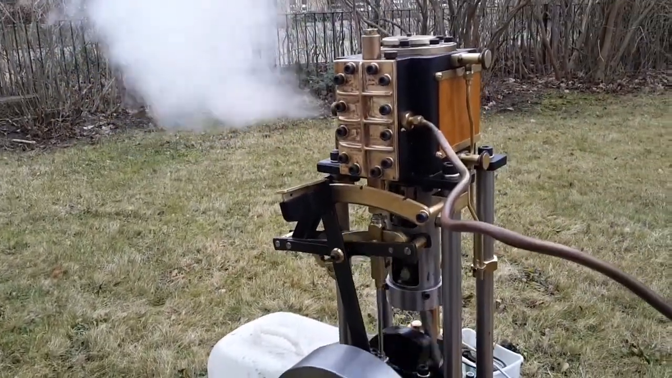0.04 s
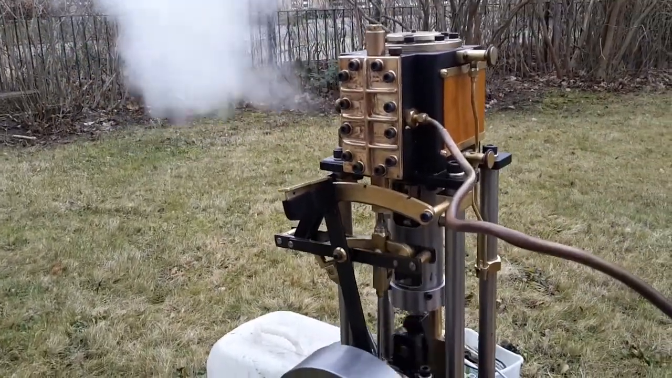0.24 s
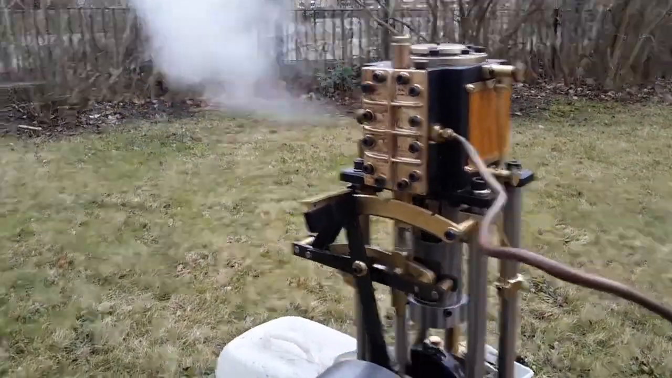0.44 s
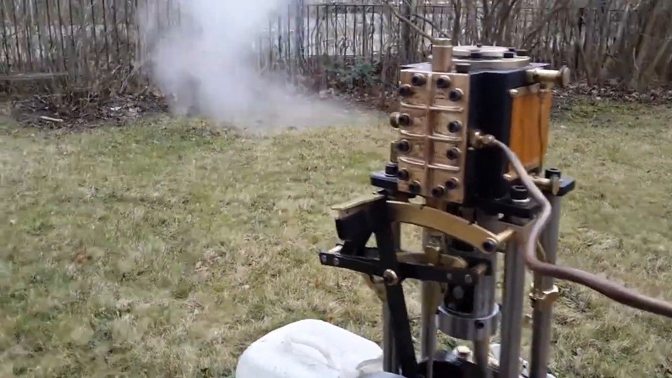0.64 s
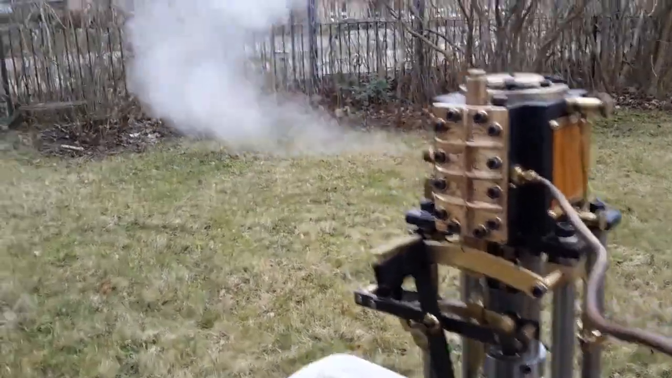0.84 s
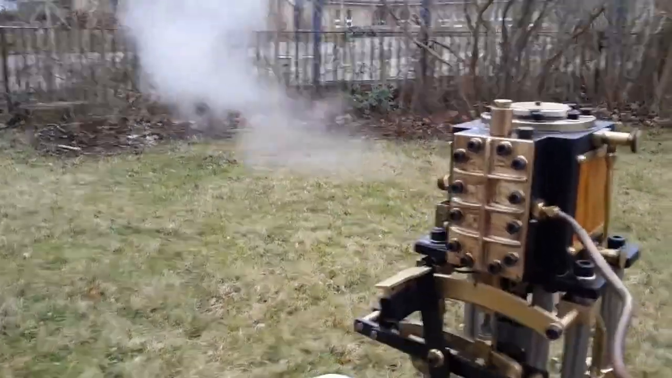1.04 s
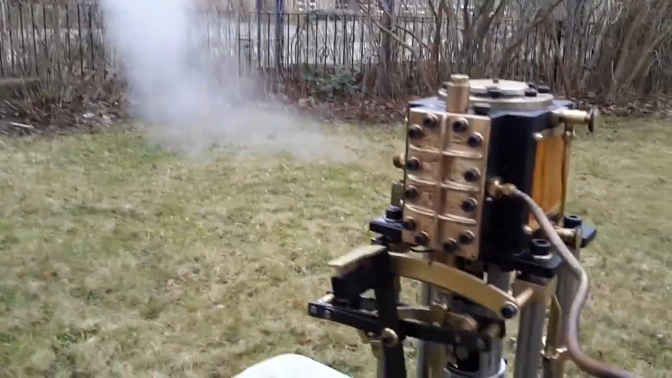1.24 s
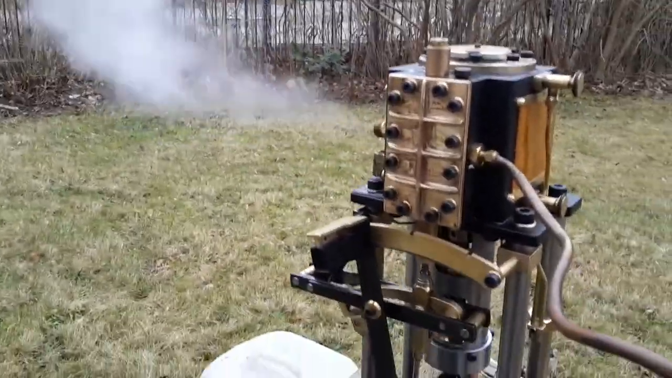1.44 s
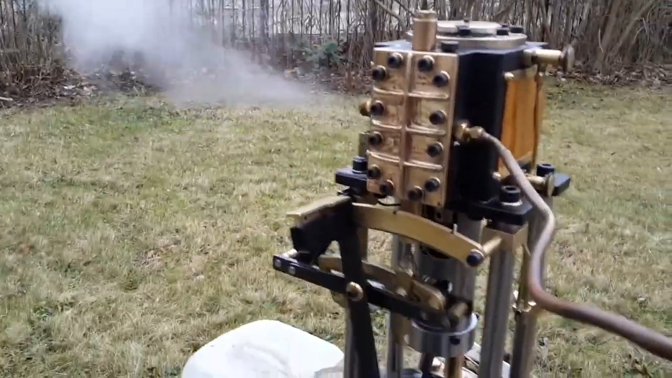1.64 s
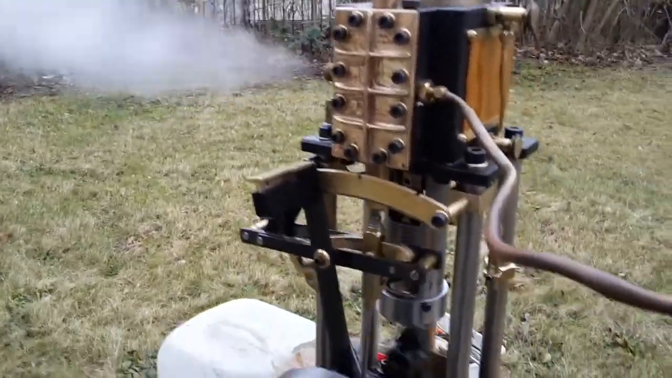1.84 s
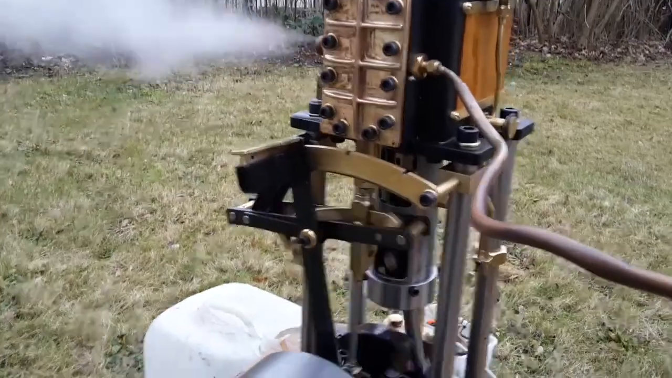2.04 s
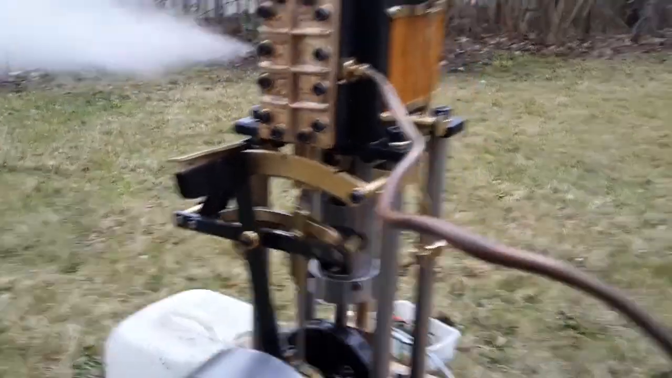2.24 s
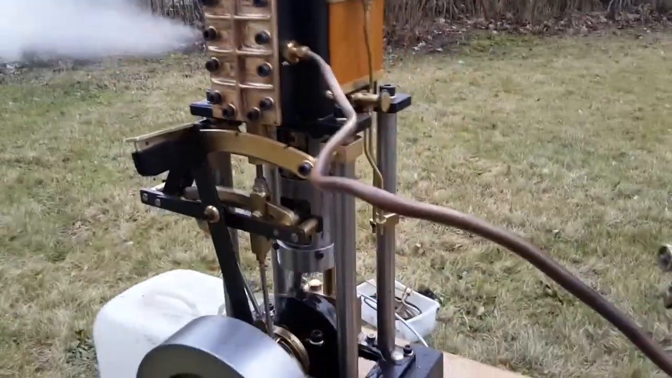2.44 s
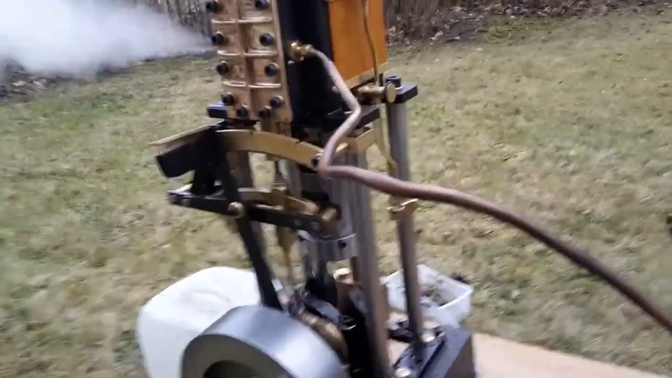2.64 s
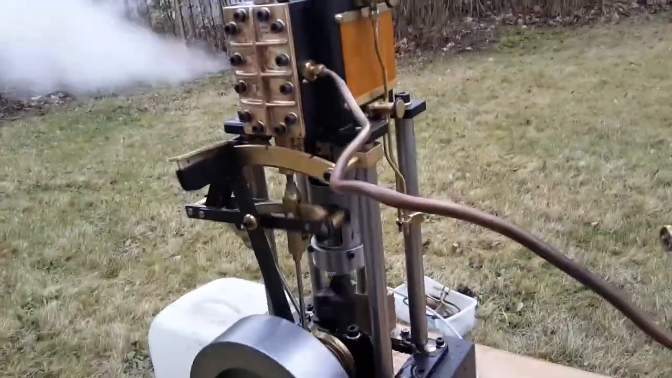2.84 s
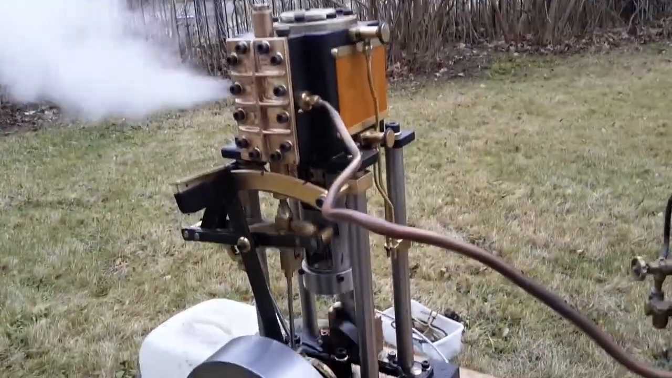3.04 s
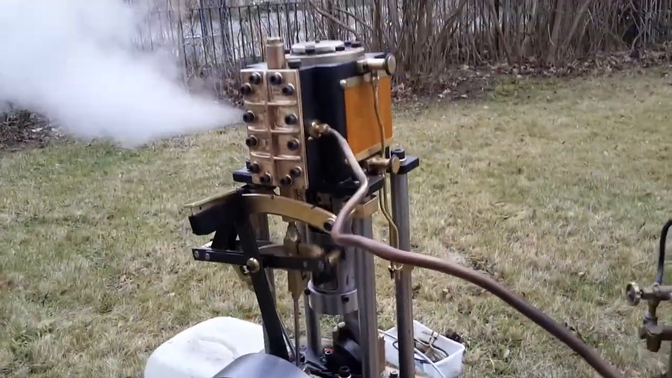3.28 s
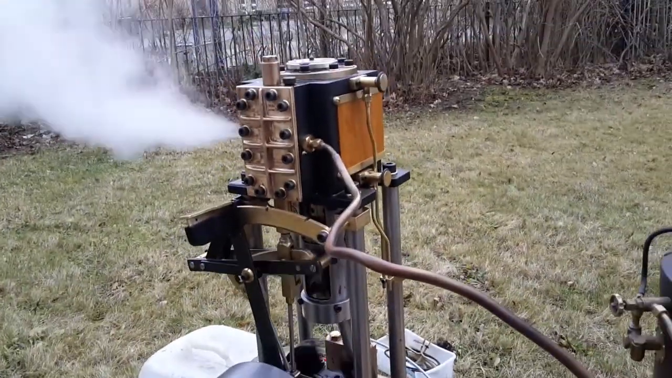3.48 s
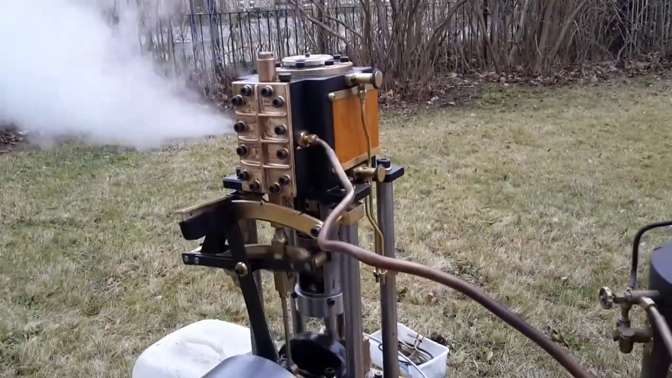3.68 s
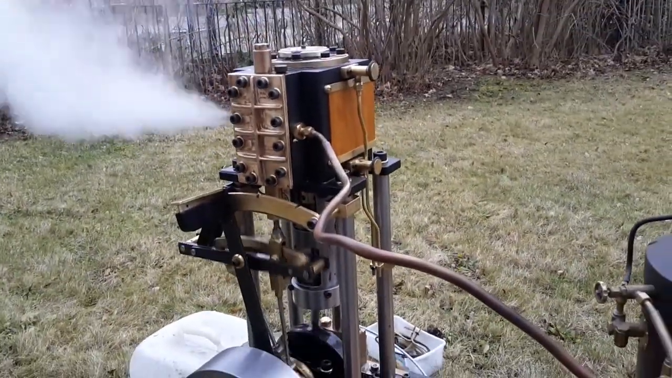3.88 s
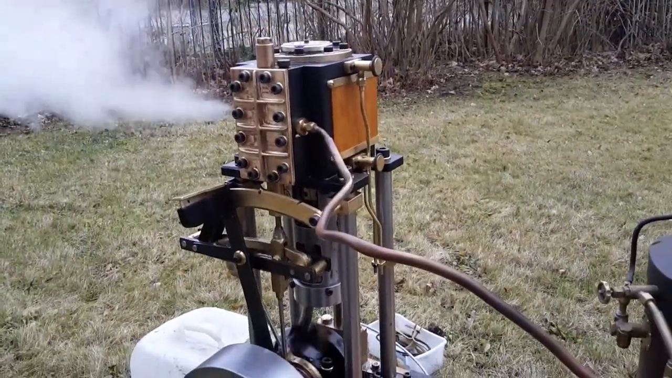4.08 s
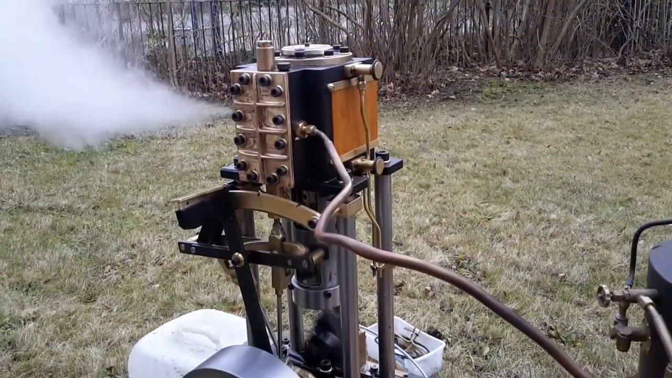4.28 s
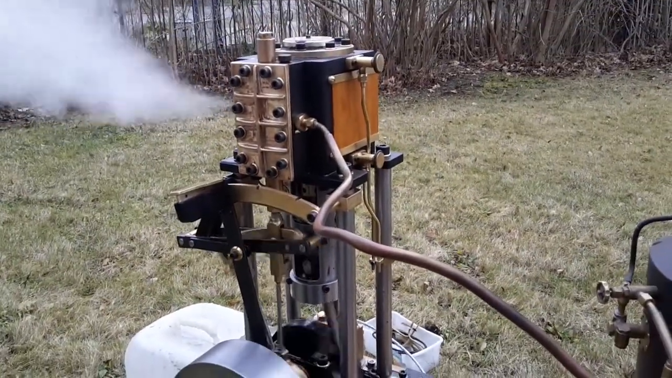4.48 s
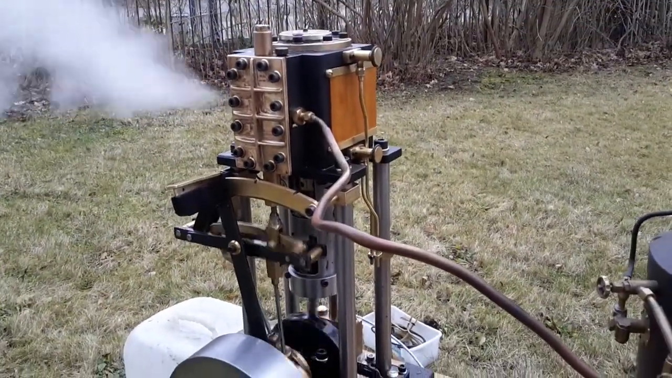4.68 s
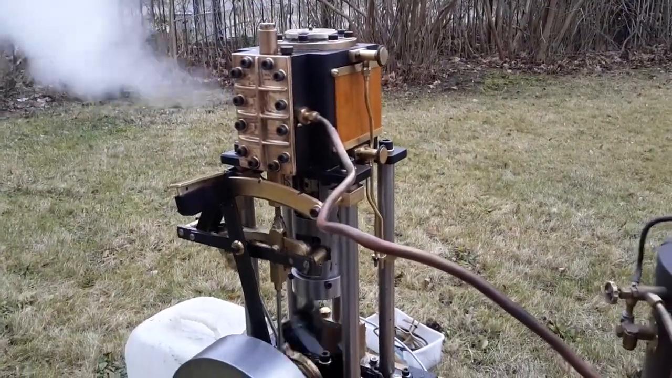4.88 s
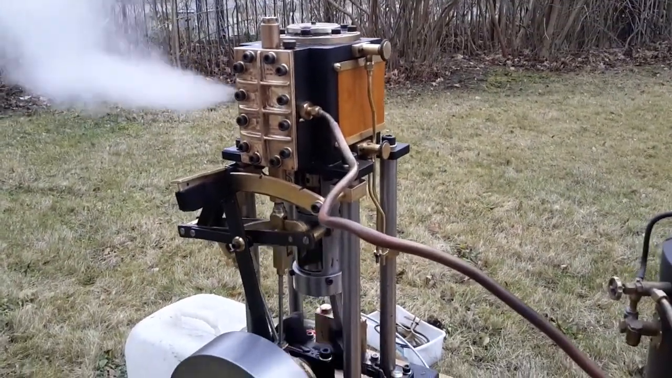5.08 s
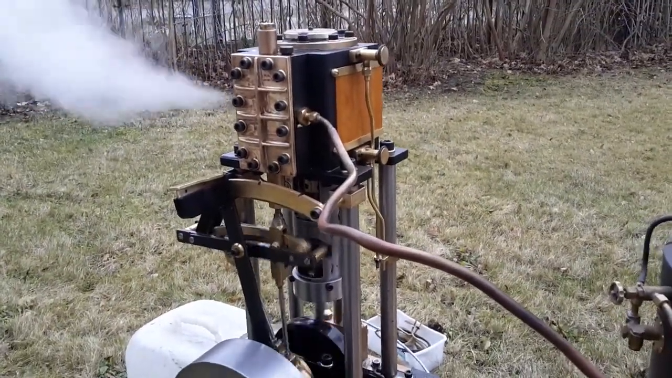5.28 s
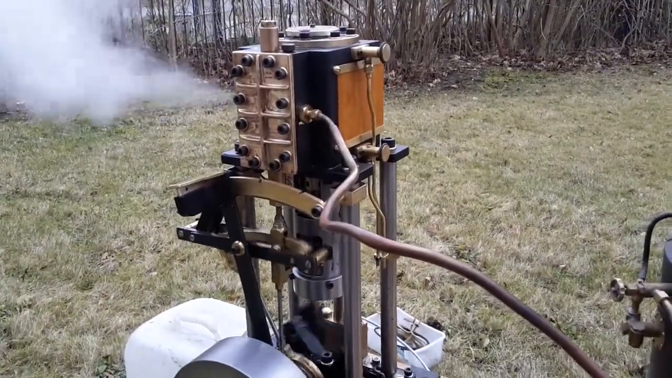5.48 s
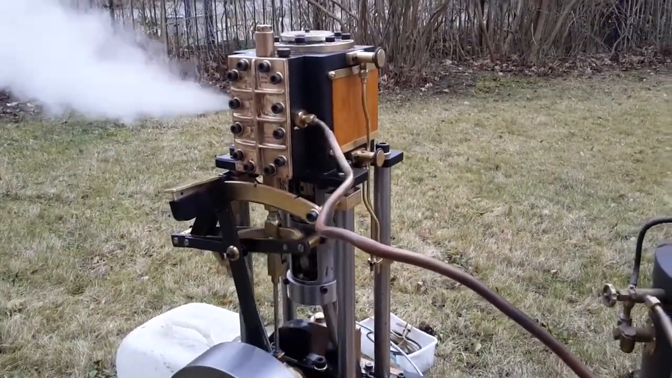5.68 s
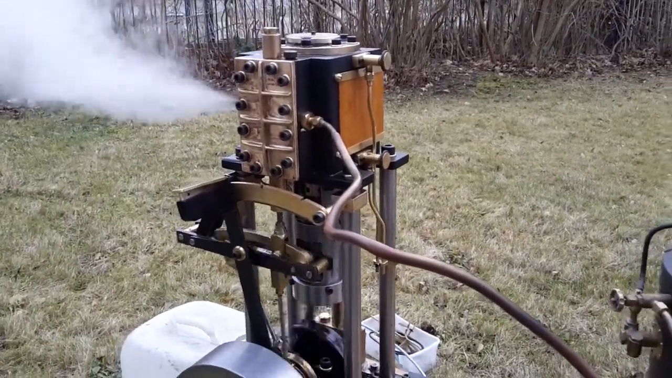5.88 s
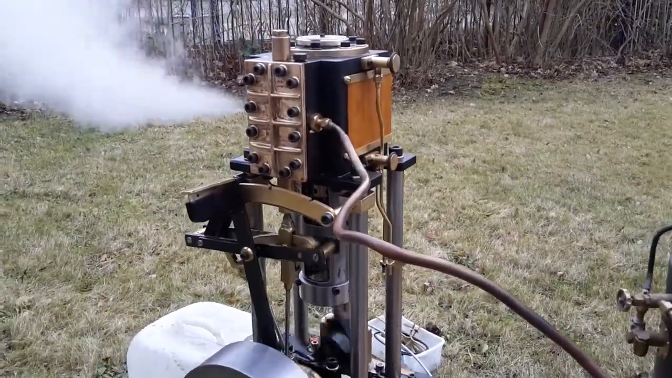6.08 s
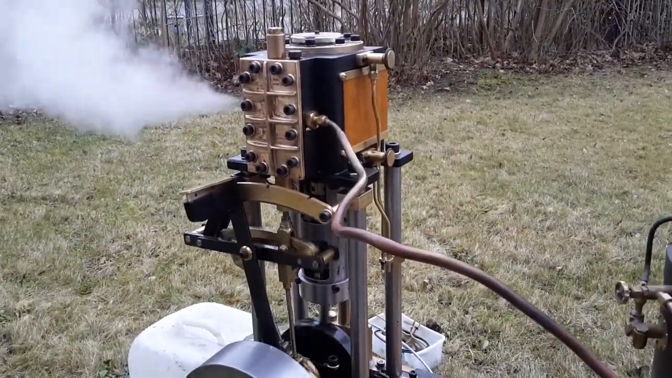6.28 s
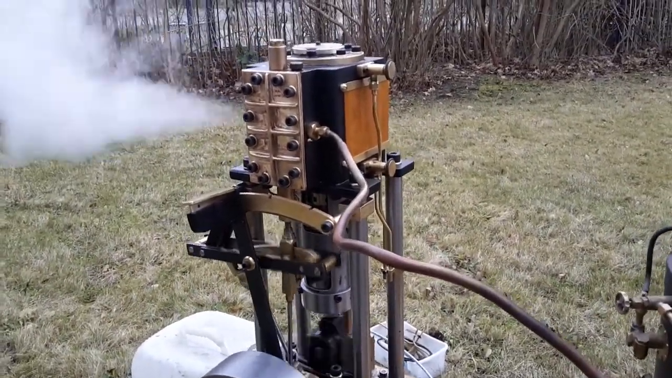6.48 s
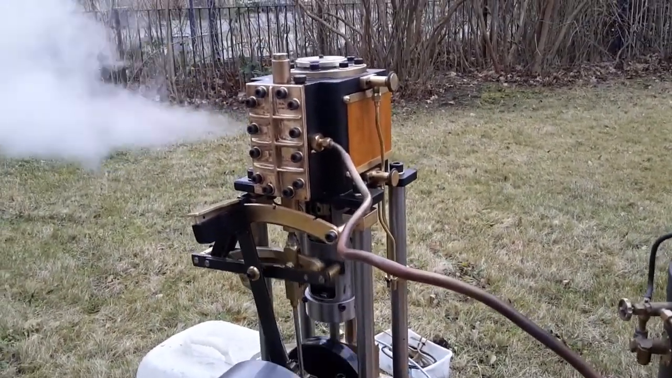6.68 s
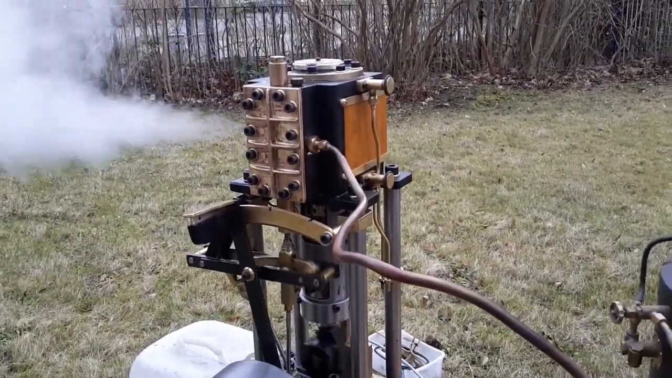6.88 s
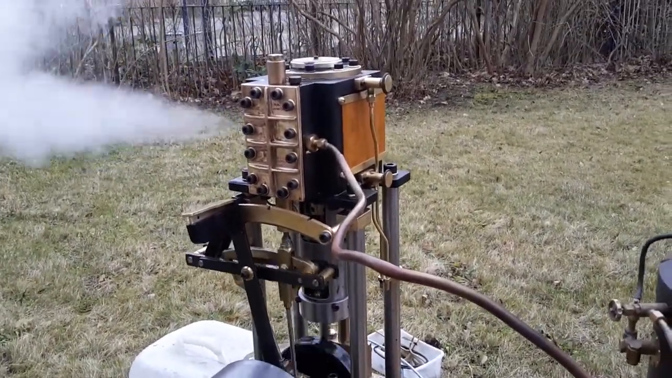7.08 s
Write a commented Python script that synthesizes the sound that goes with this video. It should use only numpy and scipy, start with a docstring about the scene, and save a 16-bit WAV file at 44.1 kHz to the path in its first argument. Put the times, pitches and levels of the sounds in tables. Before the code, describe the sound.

A small steam engine runs outdoors, close to the microphone, with a thin, whistling steam leak on the right. Its metal linkage clunks as it labours through three slow turns, each with a spit of steam, knocks and two soft chuffs. Steam squeals once and sputters, then the engine speeds up into quick chuffing and knocking with tiny bright clicks. It gradually slows and softens as the steam runs out.

```python
"""A small single-cylinder steam engine on a lawn, its leaking gland hissing and whistling on the right.
The reversing link clunks as the engine labours through three slow turns. Every turn brings a spit of
steam, knocks at both dead centres and two soft exhaust chuffs. Steam squeals once in the gland,
then the throttle opens and the engine picks up speed, with bright clicks of bare steel.
At last it slows as the steam runs out, and a slack rod adds its knock."""
import sys
import numpy as np
from scipy import signal
from scipy.fft import rfft, irfft, next_fast_len
from scipy.io import wavfile
from scipy.ndimage import map_coordinates

SR = 44100
rng = np.random.default_rng(int(sys.argv[2]) if len(sys.argv) > 2 else 0)


def transcribe(signal):
    """Save signal, clipped to [-1, 1], as a 16-bit WAV file at the path in sys.argv[1]."""
    frames = np.atleast_2d(signal).T
    limited = np.clip(frames, -1, 1)
    pcm = np.round(limited * 32767).astype(np.int16)
    wavfile.write(sys.argv[1], SR, pcm)


N = 313992
TIME = np.arange(N) / SR
FULL_DB = -35  # boiler steam at full pressure
# each stroke opens and shuts a port: widest_at_turns, opening_turns, shutting_turns
DOWN_STROKE, UP_STROKE = (0.35, 0.22, 0.095), (0.81, 0.15, 0.14)
# one row per revolution, from the upper dead centre:
# start_s, down_stroke_share, spit_db, bark_db, knock_db, down_chuff_db, up_chuff_db
TURNS = [(0.086, .42, -34.5, -42, -32, 4.5, -3), (0.6654, 0.4, -32, -40.5, -31, 7, 1),
         (1.2715, 0.51, -34.5, -44, -32, 7, 0.5), (1.823, .52, -26, -31.5, -29, 1, -6.5),
         (2.1286, 0.5, -26.5, -28.5, -28.5, -0.5, -3), (2.384, .5, -28, -30.5, -28.5, -0.5, -3),
         (2.6234, 0.49, -26.5, -30, -28, -1, -3.5), (2.8534, 0.49, -29.5, -32, -30, 0, -4),
         (3.0852, 0.49, -28.5, -32.5, -29.5, 1, -3.5), (3.315, 0.5, -30, -37, -29.5, -0.5, -3),
         (3.5495, 0.49, -31, -32.5, -30, 1.5, -2.5), (3.7888, 0.49, -31, -34.5, -29.5, 0, -3),
         (4.036, 0.49, -32, -37, -30, 0.5, -2.5), (4.293, .5, -31, -34, -30, 1.5, -2),
         (4.5586, .5, -31, -36.5, -29.5, 1, -2.5), (4.834, 0.49, -32.5, -38, -29.5, 1, -1.5),
         (5.1211, 0.47, -34, -37, -29.5, 2, -1.5), (5.423, 0.48, -34.5, -37, -29.5, 2.5, -2),
         (5.7349, 0.49, -34, -36, -29, 1.5, -2), (6.066, 0.49, -33.5, -38.5, -29.5, 2, -2.5),
         (6.424, 0.48, -34, -39, -30.5, 2.5, -3.5), (6.8056, 0.5, -35, -42, -30, 1.5, -7)]
# resonances of the rods: pitch_hz, width_hz, level_db
RODS = [(324, 150, -5.5), (526.6, 43, 19), (688, 224, 20.5), (902, 49, 13), (2440, 550, 19)]
# colour of the gland's thin hiss: frequency_hz, level_db
LEAK = [(3000, -21), (6000, -4.5), (9000, -8), (10300, 2.5), (11000, 10), (11700, 4.5), (12300, -4),
        (13100, 5), (14100, -44), (15600, -1.5)]
# colour of wet, fizzing steam: frequency_hz, level_db
FIZZ = [(3500, -62), (5000, 3.5), (8000, 1), (9300, 6.5), (10300, 1), (11700, 5), (13000, 2), (14100, -9),
        (15600, 1)]


def amp(db):
    """Decibels to gain."""
    return 10 ** (np.asarray(db) / 20)


def unit(x):
    """Scale to rms 1."""
    return x / np.sqrt(np.mean(x ** 2) + 1e-20)


def along(points, hz):
    """Read (frequency_hz, value) points on a log axis."""
    frequencies, values = np.transpose(points)
    return np.interp(np.log(hz + 1), np.log(frequencies + 1), values)


def curve(points, at=TIME):
    """Glide through (position, value) points, by default over time."""
    return np.interp(at, *np.transpose(points))


def wobble(rate):
    """A smooth random curve, rate knots a second."""
    return map_coordinates(rng.standard_normal(int(N * rate / SR) + 4), [TIME * rate])


def filtered(x, response):
    """x through a complex frequency response."""
    size = next_fast_len(N + SR // 2)
    return irfft(rfft(x, size) * response(np.fft.rfftfreq(size, 1 / SR)), size)[..., :N]


def ring(x, modes, soft_hz, alternate=False):
    """x through resonances, in step or alternating in sign, dulled above soft_hz."""
    def body(hz):
        contact = 1 / (1 + np.sqrt(2) * 1j * hz / soft_hz - (hz / soft_hz) ** 2)
        return contact * sum(
            (-1) ** (k * alternate) * amp(db) * 1j * hz * width / (pitch ** 2 - hz ** 2 + 1j * hz * width)
            for k, (pitch, width, db) in enumerate(modes))
    onset = irfft(body(np.arange(SR // 2 + 1.)))[:round(.015 * SR)]
    return filtered(x, body) / np.sqrt(np.mean(onset ** 2))  # a unit blow has rms 1 for 15 ms


def rush(spectrum):
    """Stereo noise of rms 1, alike in the bass and wide in the treble."""
    # how alike left and right are: frequency_hz, correlation
    likeness = [(25, 0.78), (100, 1), (300, 0.97), (700, 0.91), (1400, 0.47), (3100, 1), (7000, 0.02),
                (15000, 0.3)]
    def colour(hz):
        spread = np.arccos(np.clip(along(likeness, hz), -1, 1)) / 2
        return amp(along(spectrum, hz)) * [np.cos(spread), np.sin(spread)]
    mid, side = filtered(rng.standard_normal((2, N)), colour)
    return unit(np.array([mid + side, mid - side]))


def band(hz, width_hz):
    """A noise band of rms 1 around a steady or moving centre."""
    phase = 2 * np.pi * np.cumsum(np.broadcast_to(hz, N)) / SR
    return unit(wobble(width_hz) * np.cos(phase) + wobble(width_hz) * np.sin(phase))


def burst(start_s, length_s, steep=1):
    """A swell that peaks at 1 after half its length and dies away."""
    age = np.clip(2 * (TIME - start_s) / length_s, 0, 20)
    return (age * np.exp(1 - age)) ** steep


def dead_centres():
    """Times of the upper dead centre, with one more revolution at either end."""
    s = np.array(TURNS)[:, 0]
    return np.r_[2 * s[0] - s[1], s, s[-1] + 1.07 * (s[-1] - s[-2])]


def half_turns():
    """Times of all dead centres, upper and lower, and the count of turns at each."""
    upper = dead_centres()
    down_share = np.r_[.5, np.array(TURNS)[:, 1]]
    lower = upper[:-1] + down_share * np.diff(upper)
    times = np.r_[np.column_stack([upper[:-1], lower]).ravel(), upper[-1]]
    return times, np.arange(len(times)) / 2 - 1


def crank():
    """Running count of turns, whole at each upper dead centre."""
    return np.interp(TIME, *half_turns())


def pressure():
    """Steam pressure in dB: the engine idles, the throttle opens, the steam runs out."""
    idle_db, open_s, opening_s = -56, 1.688, 0.41
    run_out_s, sag_db_per_s = 2.96, 3
    boiler_db = FULL_DB - sag_db_per_s * np.maximum(TIME - run_out_s, 0)
    throttle = np.sin(np.pi / 2 * np.clip((TIME - open_s) / opening_s, 0, 1))
    return idle_db + throttle * (boiler_db - idle_db)


def opening(widest, rise, fall):
    """A 0-1 swell once per revolution, its peak and slopes given in turns."""
    past = (crank() - widest + .5) % 1 - .5
    return np.exp(-(past / np.where(past < 0, rise, fall)) ** 2)


def ports(down_db, up_db):
    """Flow through the ports in dB: one swell per stroke, over the seepage past a shut port."""
    seepage = amp(-16 + .2 * (pressure() - FULL_DB))  # weak steam gets past less easily
    down = amp(down_db) * opening(*DOWN_STROKE)
    up = amp(up_db) * opening(*UP_STROKE)
    return 10 * np.log10(seepage ** 2 + down ** 2 + up ** 2)


def open_air():
    """A faint, uneven rumble of the outdoors."""
    # colour of the air: frequency_hz, level_db
    yard = [(25, -12), (50, -5), (130, -6), (200, -8), (400, -13.5), (1200, -15.5), (1800, -31),
            (2500, -52), (4000, -36), (16000, -82)]
    return amp(-57 + 2.5 * wobble(7)) * rush(yard)


def gland():
    """The gland leaks all the time, and harder with each stroke; both flows sing its narrow notes."""
    # the constant leak: time_s, level_db
    leak_levels = [(0.0, -49.5), (1.02, -51), (1.31, -54), (1.57, -42), (2.04, -37), (4.24, -54.5),
                   (6.45, -52.5), (6.72, -48.5), (7.12, -54)]
    # hollow resonances of the gland: pitch_hz, width_hz, level_db
    cavity = [(990, 130, -5), (2320, 600, -5.5), (4070, 610, -10), (10150, 230, 1), (11260, 230, -0.5),
              (13500, 180, -2), (14300, 82, -14)]
    # its narrow notes: pitch_hz, level_db
    pitches = [(9878, -10), (10676, -23), (10889, 2.5), (11009, -7), (11111, -8.5), (11643, 5),
               (11760, 3.5), (11948, -8), (12259, 0), (12383, -8), (12602, -16), (12887, -12)]
    note_modes = [(hz, 25, db) for hz, db in pitches]  # each 25 Hz wide
    hollow = unit(ring(rng.standard_normal((2, N)), cavity, soft_hz=18200))
    notes = unit(ring(rng.standard_normal((2, N)), note_modes, soft_hz=18200, alternate=True))
    hiss = rush(LEAK) + amp(-5) * notes
    leak = amp(curve(leak_levels) + 1.8 * wobble(40))
    stroke = amp(pressure() + 0.5 * ports(down_db=4, up_db=4.5) + 0.42 * wobble(180) - 5.5)
    # the last of the downward stroke comes out wet
    wet_end = amp(1.31 * pressure() + 11.5) * opening(widest=0.46, rise=0.16, fall=0.062) * rush(FIZZ)
    return np.hypot(amp(-2.5) * leak, stroke) * hiss + amp(-8.5) * leak * hollow + wet_end


def whistles():
    """The leak sings a few thin, wavering glides."""
    # whistles of the leak: start_s, end_s, from_hz, to_hz, level_db
    glides = [(-.08, .1, 11330, 10980, -49), (.1, .26, 10500, 10020, -50), (.12, .23, 12230, 11860, -49),
              (.28, .45, 11720, 11100, -51), (.55, .66, 11150, 12100, -51), (.9, 1.25, 10880, 11200, -54),
              (1.425, 1.52, 10900, 11150, -43), (1.51, 1.565, 11850, 11800, -33)]
    sound = np.zeros(N)
    for start, end, from_hz, to_hz, db in glides:
        progress = np.clip((TIME - start) / (end - start), 0, 1)
        hz = (from_hz + (to_hz - from_hz) * progress) * (1 + .0025 * wobble(120))
        envelope = amp(db + 2 * wobble(60)) * np.sin(np.pi * progress)
        sound += envelope * np.sin(2 * np.pi * np.cumsum(hz) / SR)
    return sound


def clunks():
    """The reversing link slaps its stops: each dry blow has a crack, two bounces and a brief chatter."""
    # slaps as the engine rocks over: start_s, level_db
    slaps = [(0.002, -32.5), (0.061, -33), (.09, -46), (.123, -51), (0.203, -45), (0.301, -45),
             (0.424, -29), (.443, -40.5), (.462, -46)]
    # resonances of the link: pitch_hz, width_hz, level_db
    link = [(134.3, 3.4, 16), (184, 6.4, 8), (243.4, 7.9, 14.5), (289, 7.1, 10), (330, 75, 9.5),
            (420, 11.2, 6.5), (794, 350, -11.5), (1160, 136, -2.5), (1320, 125, -4)]
    bounce_s, bounce_loss_db = 0.018, 9.5
    blows, chatter = np.zeros((2, N))
    for first_s, first_db in slaps:
        for bounce in range(3):
            s, db = first_s + bounce * bounce_s, first_db - bounce * bounce_loss_db
            blows[round(s * SR)] = amp(db)
            chatter += amp(db) * burst(s, length_s=0.0078, steep=0.64)
    cracks = sum(amp(db) * burst(s, length_s=0.0038) for s, db in slaps)
    body = ring(blows + amp(-28) * chatter * rng.standard_normal(N), link, soft_hz=1300, alternate=True)
    return body + amp(-7.5) * cracks * rng.standard_normal(N)


def spits():
    """Single drops sputter in the gland, and wet steam bursts out with a bark as the port opens."""
    # drops of water: start_s, hiss_db, bark_db, length_s
    sputters = [(0.035, -43, -66, 0.0055), (0.255, -38.5, -48, 0.0076), (0.322, -49, -51.5, 0.02),
                (0.904, -46.5, -60.5, 0.028), (1.242, -40, -47, 0.016), (1.567, -25.5, -44, 0.015),
                (1.884, -19.5, -45, 0.009), (1.893, -26.5, -42, 0.018), (1.976, -46, -37, 0.013)]
    # colour of the bark: frequency_hz, level_db
    throat = [(600, -1.5), (1500, 0), (1900, -6), (2250, 3.5), (2600, 1.5), (2950, 8), (3500, -5),
              (5000, -15.5), (8000, -38)]
    attack_s, hold_until_s, release_s = 0.0037, 0.012, 0.0071
    fizz, bark, drops = np.zeros((3, N))
    for s, db, bark_db, length_s in sputters:
        shape = burst(s, length_s, steep=1.1)
        drops += amp(db) * shape
        bark += amp(bark_db) * shape
    for s, _, db, bark_db, *_ in TURNS:
        age = np.maximum(TIME - s, 0)
        shape = np.minimum(age / attack_s, 1) * np.exp(-np.clip((age - hold_until_s) / release_s, 0, 20))
        fizz += amp(db) * shape
        bark += amp(bark_db) * shape
    spatter = amp(wobble(760))
    steam = fizz * rush(FIZZ) + bark * rush(throat)
    return spatter * (steam + drops * (rush(LEAK) + amp(-17) * rush(FIZZ)))


def knock_cues():
    """Slack takes up at the same places every turn: peak_s, swell_s, thump_db, bump_db, clack_db."""
    # knocks of one revolution: place_turns, lag_s, swell_s, thump_db, bump_db, clack_db,
    # weight_db_per_speed_doubling, clack_db_per_speed_doubling
    pattern = [(0, 0, 0.0017, -4.5, -1.5, -14, 0.5, .5), (.02, 0.0081, 0.0036, -5.5, -5.5, -18, 4.5, 4),
               (.05, .009, 0.0053, 0.5, -7, -11.5, 3, 7), (.47, -.002, 0.0022, -14, -12.5, -20, 7, 9),
               (.52, .0135, 0.011, -1.5, -9, -25, 5.5, 9)]
    running_turns_per_s, slack_from_s = 4.18, 4.5
    times, turns = half_turns()
    periods = np.diff(dead_centres())[1:]
    cues = []
    for turn, (s, _, _, _, db, _, _) in enumerate(TURNS):
        doublings = -np.log2(periods[turn] * running_turns_per_s)
        for place, lag, swell, thump_db, bump_db, clack_db, weight_grows, clack_grows in pattern:
            peak_s = np.interp(turn + place, turns, times) + lag
            weight_db = db + weight_grows * doublings
            bright_db = db + clack_grows * doublings
            cues.append((peak_s, swell, weight_db + thump_db, weight_db + bump_db, bright_db + clack_db))
        if s > slack_from_s:  # steam too weak to cushion the piston: the rod adds a slow-swelling knock
            cues.append((s + 0.05, 0.1, db - 14.5, db - 12.5, db - 19))
    return cues


def knocks():
    """Oiled contacts swell to one main blow: the frame thumps, a bearing bumps and the rods rattle."""
    # resonances of the frame: pitch_hz, width_hz, level_db
    frame_modes = [(111.3, 16, 4), (132.6, 15, 3.5), (175.2, 31.5, 8.5), (253, 30.5, 7)]
    # resonances of the main bearing: pitch_hz, width_hz, level_db
    bearing_modes = [(250.6, 68, 3), (324, 85, -1.5), (492, 41, -20)]
    bounce_s, low_cut_hz = .0074, 85  # the frame's own bounce; being small, it radiates little bass
    thumps, bumps, judder, rattle = np.zeros((4, N))
    cues = knock_cues()
    sample = lambda s: np.clip(np.round(s * SR).astype(int), 0, N - 1)
    contacts = np.arange(-3, 4)  # 0 is the main blow
    for s, swell, thump_db, bump_db, clack_db in cues:
        offsets = contacts * bounce_s + .0006 * rng.standard_normal(len(contacts)) * (contacts != 0)
        sizes = np.exp(-np.maximum(-offsets / swell, offsets / .007))
        thumps[sample(s + offsets)] -= amp(thump_db) * sizes
        bumps[sample(s)] += amp(bump_db)
        near = slice(*np.searchsorted(TIME, [s - .1, s + .1]))
        age = TIME[near] - s
        judder[near] += amp(thump_db) * np.exp(-np.maximum(-age / swell, age / .014))
        rattle[near] += amp(clack_db) * np.exp(-np.maximum(-age / .0035, age / .008))
    frame = ring(amp(-5) * thumps + amp(-34) * judder * rng.standard_normal(N), frame_modes, soft_hz=300)
    frame = filtered(frame, lambda hz: -hz ** 2 / (low_cut_hz ** 2 - hz ** 2 + 1j * hz * low_cut_hz))
    bearing = amp(-3) * ring(bumps, bearing_modes, soft_hz=754, alternate=True)
    rods = ring(amp(-23) * rattle * rng.standard_normal(N), RODS, soft_hz=1270)
    ticks = sum(amp(clack_db) * burst(s, length_s=0.0032) for s, *_, clack_db in cues)  # bare metal
    return frame + bearing + rods + amp(-3) * ticks * rush(FIZZ)


def chuff_levels():
    """Strength in dB of the downward and of the upward chuff, gliding from turn to turn."""
    *_, down_db, up_db = np.transpose(TURNS)
    turns, whole = crank(), np.arange(len(TURNS))
    return np.interp(turns, whole + DOWN_STROKE[0], down_db), np.interp(turns, whole + UP_STROKE[0], up_db)


def exhaust():
    """The valve lets out two chuffs a turn: hollow at low pressure, a broad rush at high pressure."""
    # colour of the jet: frequency_hz, level_db
    jet_colour = [(300, -59), (420, -4), (680, 8), (900, 1), (1100, 6.5), (1280, 5), (1600, 5.5),
                  (1900, -1.5), (2300, 8), (2550, 6.5), (3200, 6), (4200, -16), (7000, 2.5), (10000, -13.5)]
    # colour of the rumbling plume: frequency_hz, level_db
    plume_colour = [(25, -13), (60, -38), (80, -4), (96, 2), (112, -13.5), (140, -7), (190, -8.5),
                    (280, -11.5), (400, -23), (900, -36)]
    # the note of the steam passages at full pressure, moving with the piston: place_turns, pitch_hz
    passage_notes = [(0, 1260), (.13, 1180), (.27, 1290), (.4, 1480), (.5, 1250), (.62, 1200), (.8, 1290),
                     (1, 1260)]
    rest_hz, pipe_hz, easy_running_db = 1181, 2294, -43
    place, pressure_db = crank() % 1, pressure()
    surplus_db = pressure_db - easy_running_db
    port_db = ports(*chuff_levels())
    flow = amp(pressure_db + port_db + 1.03 * wobble(90))
    jet = amp(0.2 * surplus_db) * rush(jet_colour)
    passage_hz = rest_hz + amp(pressure_db - FULL_DB) * (curve(passage_notes, place) - rest_hz)
    passage = amp(-.2 * surplus_db + .3 * port_db - 6.5) * band(passage_hz, width_hz=170)
    pipe = amp(-.55 * surplus_db + .45 * port_db - 9) * band(pipe_hz, width_hz=280)
    # the rasp comes through only near full pressure
    rasp = amp(pressure_db + surplus_db + 0.93 * port_db - 18) * band(4000, width_hz=1400)
    plume_db = 0.56 * np.minimum(surplus_db, 0) + 0.6 * np.maximum(surplus_db, 0)
    plume = amp(plume_db + 0.6 * port_db - 47) * rush(plume_colour)
    # the valve snaps shut and ends the downward chuff
    cut_off = amp(pressure_db) * np.exp(-((place - .455) / 0.048) ** 2)
    rods = unit(ring(rng.standard_normal(N), RODS, soft_hz=1500))
    snap = cut_off * (amp(-14) * rods + amp(-6.5) * band(2900, width_hz=470))
    return flow * (jet + passage + pipe) + rasp + plume + snap


def scattered(x, t60_s=.018, level_db=-7):
    """Nearby metalwork adds a brief spray of reflections, different left and right."""
    age = np.arange(SR // 10) / SR
    tail = rng.standard_normal((2, len(age))) * 1000 ** (-age / t60_s)
    tail /= np.linalg.norm(tail[0])
    return x + amp(level_db) * signal.fftconvolve(x[None], tail, axes=1)[:, :N]


def squeal():
    """Steam squeals once in the gland, on a rough pitch that sags in steps and frays into hiss."""
    # the falling fundamental: time_s, pitch_hz
    pitches = [(1.346, 4800), (1.36, 4540), (1.37, 4160), (1.388, 4000), (1.402, 3710), (1.416, 3620),
               (1.428, 3600)]
    # partials of the squeal: pitch_multiple, level_db
    partials = [(1, -7), (2, -7.5), (3, 8.5), (3.5, -7), (4, 0)]
    start_s, attack_s, hold_s, t60_s = 1.345, 0.016, 0.05, 0.096
    age = np.maximum(TIME - start_s, 0)
    hz = curve(pitches) * (1 + .023 * wobble(2500) + .016 * wobble(400))
    phase = 2 * np.pi * np.cumsum(hz) / SR
    release_db = -60 * np.maximum(age - attack_s - hold_s, 0) / t60_s
    envelope = np.minimum(age / attack_s, 1) * amp(-31 + release_db + 2.7 * wobble(400))
    tone = sum(amp(db) * np.sin(multiple * phase) for multiple, db in partials)
    hiss = amp(-26) * rush(LEAK) + amp(-33) * rush(FIZZ)
    fray = amp(-51) * burst(start_s + attack_s, length_s=0.071) * band(4100, width_hz=520)
    return scattered(envelope * tone) + envelope * hiss + fray


def pings():
    """Bare steel meets with a tiny, bright click, mostly on the fastest turns."""
    # clicks soon after the upper dead centre: start_s, level_db
    clicks = [(2.1527, -33), (2.407, -38), (2.645, -36), (2.8758, -39), (3.1066, -41), (3.3379, -41),
              (5.475, -40), (6.49, -37), (6.857, -33)]
    strikes = sum(amp(db) * burst(s, length_s=0.0017) for s, db in clicks)
    return strikes * band(14000, width_hz=4500)


def scene():
    """The engine over the rumble of the open air, its hiss close to the right microphone port."""
    # stereo balance: frequency_hz, left_minus_right_db
    balance = [(100, 1), (200, -0.1), (700, -2.5), (1300, -1), (2400, 1), (4400, -2.5), (8100, -13.5),
               (10500, -21.5), (12500, -15), (15000, 3.5)]
    # how far the left port leads: frequency_hz, lead_radians
    leads = [(40, 0.033), (2400, 0.74), (16000, 2.03)]
    def placement(hz):
        lean = amp(np.outer([.5, -.5], along(balance, hz)))
        lead = np.exp(1j * np.outer([.5, -.5], along(leads, hz)))
        return lead * lean / np.sqrt(np.mean(lean ** 2, axis=0))
    sound = open_air() + gland() + whistles() + clunks() + spits() + knocks()
    sound += exhaust() + squeal() + pings()
    return filtered(sound, placement)


def record(dry):
    """The microphone is hollow between 4 and 8 kHz and keeps nothing above its band limit."""
    # tone of the microphone: frequency_hz, gain_db
    response = [(22, -9), (45, 4), (3300, -4), (3700, -9.5), (4200, -14.5), (4600, -17.5), (5600, -24),
                (6500, -15), (7150, -28), (7900, -12), (8700, -1.5)]
    top_hz = 15850
    return filtered(dry, lambda hz: amp(along(response, hz)) * (hz < top_hz))


dry = scene()
out = record(dry)
transcribe(out)
```